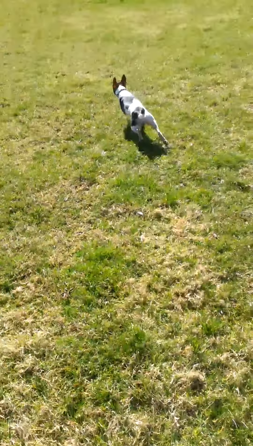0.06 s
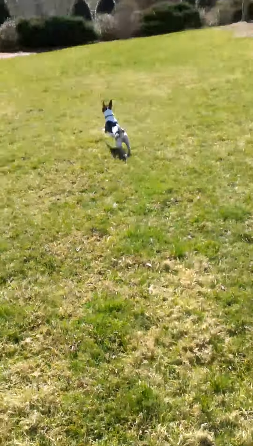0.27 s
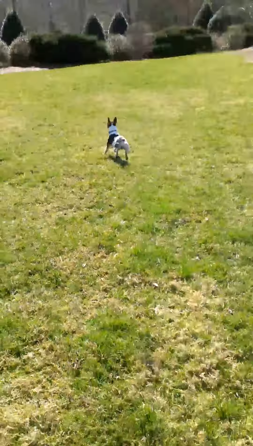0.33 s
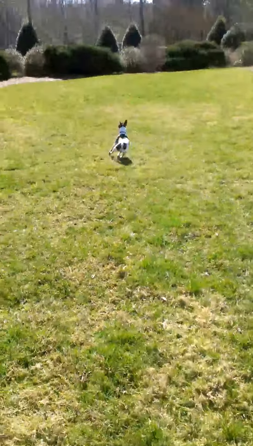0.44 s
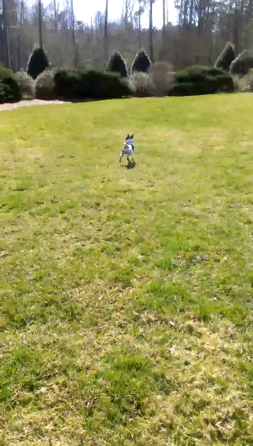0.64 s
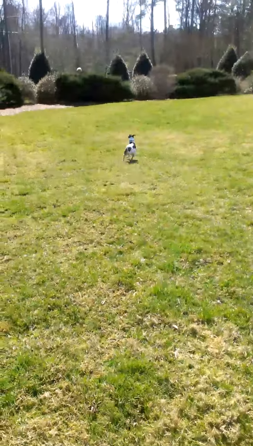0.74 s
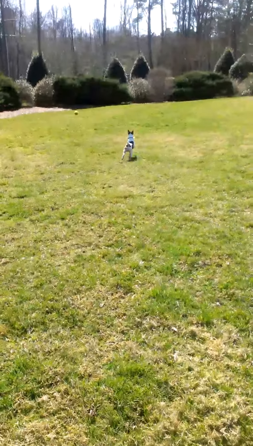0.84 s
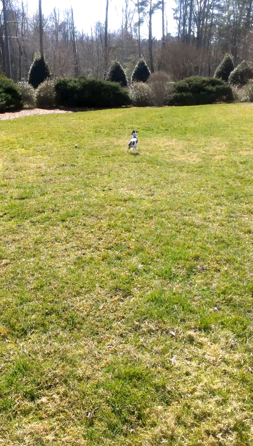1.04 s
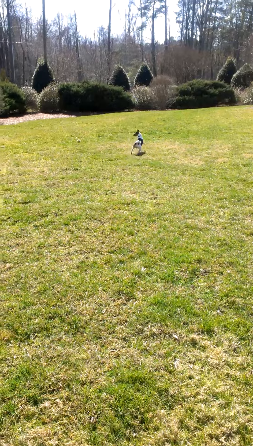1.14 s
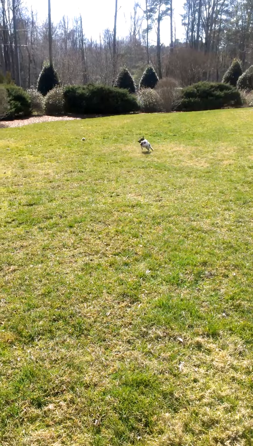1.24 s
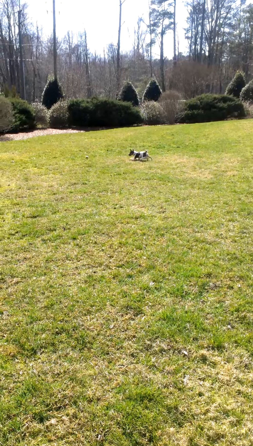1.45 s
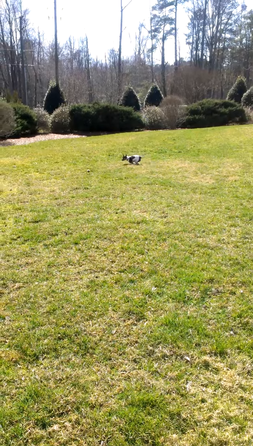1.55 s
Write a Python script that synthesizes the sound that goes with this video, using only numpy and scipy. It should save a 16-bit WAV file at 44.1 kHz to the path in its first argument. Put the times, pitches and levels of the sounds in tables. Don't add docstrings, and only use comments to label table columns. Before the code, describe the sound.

Small metal dog tags jingle in high, dry, quickly damped clinks, loudest in the first part, with paw swishes, crackling grass and soft thumps; open lawn, faint hiss and traffic rumble, handheld stereo microphone.

```python
import sys
import numpy as np
from scipy import signal
from scipy.fft import rfft, irfft
from scipy.io import wavfile
from scipy.ndimage import uniform_filter1d

SR = 44100
rng = np.random.default_rng(int(sys.argv[2]) if len(sys.argv) > 2 else 0)


def undo_db(level):
    steps = np.asarray(level, float) / 20
    return 10 ** steps


def log_audio(samples):
    frames = np.atleast_2d(samples).T
    limited = np.clip(frames, -1, 1)
    pcm = np.round(limited * 32767).astype(np.int16)
    wavfile.write(sys.argv[1], SR, pcm)


N = 70560

# (frequency [Hz], density [dB per Hz])
AIR_SPECTRUM = [(800, 1.5), (1500, -2), (3000, -5), (5000, -5.5), (10500, -1.5), (15800, -5.5)]
AIR_DB = -62.5
AIR_DUCK_DB = -19.5

# (frequency [Hz], density [dB per Hz])
RUMBLE_SPECTRUM = [(18, 14), (30, 6), (59, -16), (129, -15), (167, 3.5), (307, -2.5), (792, -10.5),
                   (1500, -32), (1950, -28), (3300, -120)]
RUMBLE_DB, RUMBLE_FALL_DB_PER_S = -61.5, 1.1
# (middle [s], level lift [dB], half width [s])
PAW_SCUFFS = [
    (0.067, -7, 0.018),
    (0.261, 7, 0.02),
    (0.508, -3.5, 0.041),
]

HUM_HZ, HUM_WIDTH_HZ, HUM_DB = 149, 29, -65.5

# (start [s], length [s], level [dB], first pitch [Hz], last pitch [Hz])
BIRD_CHIRPS = [
    (1.018, 0.017, -69, 3100, 3050),
    (1.03, 0.05, -64.5, 4230, 4010),
    (1.064, 0.021, -64.5, 3210, 3220),
    (1.081, 0.024, -59.5, 3105, 3044),
    (0.704, 0.039, -70.5, 1920, 1790),
    (.82, 0.014, -69.5, 3360, 3220),
    (1.155, 0.0093, -67, 3930, 3660),
    (1.367, 0.059, -75, 2310, 2010),
]

# (start [s], ring [s], level [dB], pitch [Hz], fade [dB])
GROUND_THUMPS = [
    (.122, 0.045, -55, 155.5, 9),
    (.24, 0.011, -42, 195, 13.5),
    (.254, 0.031, -45.5, 150, 0),
    (1.355, 0.037, -53.5, 140, -13),
    (1.358, 0.021, -57.5, 454, -20),
    (1.403, 0.01, -43.5, 223, -41),
    (1.089, 0.0066, -53, 786, -10),
    (1.09, 0.012, -58, 203, -11),
]
THUMP_RISE_S = 0.0021

# (middle [s], level [dB], half width [s])
GRASS_SWISHES = [(0, -51.5, 0.013), (0.064, -44, 0.017), (0.122, -53, 0.0094), (.19, -60, 0.009),
                 (0.215, -53.5, 0.017), (0.257, -54, 0.014), (.278, -45.5, 0.015), (.45, -62.5, 0.019),
                 (0.546, -56, 0.014), (0.598, -60, 0.0052), (.8, -68.5, 0.046), (0.879, -58.5, 0.0076),
                 (1.093, -50.5, 0.0098), (1.154, -64, 0.025), (1.385, -67.5, 0.055)]
# (frequency [Hz], density [dB per Hz])
GRASS_SPECTRUM = [(300, -10.5), (900, -24.5), (2000, -33.5), (3800, -16.5), (5300, -8), (8000, -3),
                  (16000, -19.5)]
RUSTLE_DB, RUSTLE_DB_PER_S = -56.5, -12.5
BLADES_PER_S, BLADE_SPREAD_DB = 5000, -1

# (time [s], peak [dB], pitch [Hz])
STALK_SNAPS = [(0.054, -44, 7900), (0.052, -37.5, 6600), (0.0548, -39, 7800), (0.0578, -31, 8600),
               (0.0596, -49, 7600), (0.0597, -34, 5350), (0.0619, -29, 7600), (0.0652, -40, 8300),
               (0.067, -33, 6600), (0.071, -46, 9700), (0.072, -51, 6750), (0.0727, -44, 7360),
               (0.077, -39, 7800), (0.112, -36.5, 5960), (0.1275, -51, 10000), (0.129, -39.5, 7800),
               (0.1912, -40, 10000), (0.1927, -36, 9900), (0.2167, -49, 7100), (0.2185, -38, 7650),
               (0.2194, -41, 6300), (0.2481, -37, 9700), (0.2512, -43, 10200), (0.2574, -37, 6300),
               (0.261, -35, 5460), (0.263, -43, 7340), (0.264, -35.5, 5800), (0.3388, -43, 6900),
               (0.446, -45, 8000), (0.4541, -53, 8350), (0.455, -41.5, 7400), (0.4717, -50, 9900),
               (0.4907, -41, 9450), (0.497, -45, 8200), (0.5043, -48, 10600), (0.597, -52, 6800),
               (0.5987, -55, 7500), (0.768, -45, 9200), (0.7695, -49, 7740), (0.8219, -39.5, 7030),
               (0.8587, -43, 9300), (0.9242, -45.5, 7800), (1.0897, -38, 7800), (1.0944, -40, 10000),
               (1.0953, -37.5, 6820), (1.096, -51, 7800), (1.1199, -45.5, 8600), (1.1529, -44.5, 8400),
               (1.1546, -42, 7000), (1.301, -53, 7700), (1.4466, -42, 6480), (1.468, -48, 8900),
               (1.5643, -38.5, 7880), (1.5661, -42.5, 6700)]
SNAP_S, SNAP_TAIL = 0.0004, 0.25

JANGLE_WIDTH_HZ, JANGLE_TOUCHES_PER_S, JANGLE_DB = 50, 130, -4.5

# (start [s], free ring [s], level [dB], pitch [Hz], fade over ring [dB])
DISC_STRIKES = [(0.116, 0.021, -56, 10170.0, 10), (0.2455, 0.01, -53, 9800, -8),
                (0.271, 0.0055, -50, 10300, 2), (0.2772, 0.0049, -29, 10180, -35),
                (0.284, 0.0063, -39.5, 10400, -5), (0.3985, 0.012, -30.5, 10040, 7),
                (0.408, 0.014, -38, 10140, -8), (0.5325, 0.0067, -45, 10050, 7),
                (0.5362, 0.006, -36.5, 10600, -5), (0.5405, 0.0071, -43.5, 9940, -2),
                (0.679, 0.027, -26, 10050, 3), (0.7055, 0.01, -25.5, 10090, -26),
                (0.792, 0.017, -55, 10050, -19), (1.024, 0.03, -57, 10060, -12),
                (0.8712, 0.0065, -48.5, 10070, 0), (0.881, 0.0057, -48.5, 10500, -3),
                (1.151, 0.018, -60.5, 10100, 1), (1.322, 0.023, -52.5, 10095.0, -7),
                (1.358, 0.098, -66, 10340, -8), (1.511, 0.022, -51.5, 10180, -4)]
# (start [s], free ring [s], level [dB], pitch [Hz], fade over ring [dB])
RING_STRIKES = [(0.1805, 0.01, -43, 9540, 2), (0.272, 0.012, -36, 9750.0, 12),
                (0.282, 0.013, -45, 9575.0, -13), (0.3985, 0.0072, -35, 9510, -7),
                (0.408, 0.014, -40.5, 9420, -18), (0.4795, 0.0077, -44, 9570, -2),
                (0.7055, 0.01, -37.5, 9530, -22), (0.718, 0.012, -53, 9470.0, -13),
                (0.8762, 0.0047, -47.5, 9970, 8), (1.025, 0.018, -50, 9580, -18),
                (1.322, 0.021, -56.5, 9660, 12), (1.511, 0.031, -55, 9645.0, 11)]
# (start [s], free ring [s], level [dB], pitch [Hz], fade over ring [dB])
PLATE_STRIKES = [
    (0.276, 0.011, -40.5, 6200, -1),
    (0.399, 0.0075, -47, 6170, 13),
    (0.4085, 0.0072, -48, 6000, 2),
    (0.679, 0.016, -52, 6070, -23),
    (0.706, 0.018, -41.5, 6070, -30),
    (0.8712, 0.0061, -50, 6000, -3),
    (1.024, 0.008, -57.5, 6100, -12),
    (1.322, 0.039, -59, 6190, 5),
    (1.511, 0.03, -58.5, 6230, 10),
]
# (start [s], free ring [s], level [dB], pitch [Hz], fade over ring [dB])
BUCKLE_STRIKES = [
    (0.113, 0.0089, -42.5, 6800.0, -7),
    (0.27, 0.0066, -38, 7085.0, 11),
    (0.412, 0.04, -57, 6885.0, -14),
    (0.679, 0.017, -65, 6870.0, -36),
    (0.71, 0.032, -52, 6825.0, -3),
    (0.743, 0.033, -54.5, 6840.0, 2),
]
# (start [s], free
# ring [s], level [dB], pitch [Hz], fade [dB])
LINK_STRIKES = [(.273, .013, -44, 14470, -4), (.3985, .008, -49, 13130, 0), (.399, .012, -48, 8720, -2),
                (.408, .024, -47, 13130, -12), (.534, .006, -49, 14450, -4), (.6785, .013, -62, 3640, -2),
                (.68, .016, -56, 13160, -6), (.7055, .024, -48, 13100, -16), (.7055, .008, -40, 10500, -10),
                (.7055, .006, -45, 7770, -15), (.873, .005, -59, 15500, 0), (1.025, .022, -63, 13200, -3)]
# (pitch ratio, level [dB], extra fade [dB])
DISC_OVERTONES = [(1.535, -35, -13)]
# (pitch ratio, level [dB], extra fade [dB])
RING_OVERTONES = [(1.485, -13, 0)]
# (pitch ratio, level [dB], extra fade [dB])
PLATE_OVERTONES = [(1.301, -15, -24)]
# (pitch ratio, level [dB], extra fade [dB])
BUCKLE_OVERTONES = [(2.258, -9, 0)]
# (time [s], left-right [dB])
DISC_FACING = [(.6, 4), (0.673, 4), (.703, 8), (.706, 0), (1.3, 2)]
# (time [s], peak [dB])
METAL_TICKS = [
    (0.3967, -53),
    (0.4064, -18),
    (0.5336, -22.5),
    (0.6794, -19),
    (0.705, -27.5),
    (1.0225, -34),
    (1.509, -32),
]
# (frequency [Hz], gain [dB])
TICK_SPECTRUM = [(4800, -32.5), (6200, -7.5), (9500, 1.5), (11800, -29), (14500, -3), (16000, -24)]
TICK_S, TICK_DB, TICK_LATE_S = 0.00023, -2.5, 0.001298

METAL_RISE_S, DAMP_POWER = 0.00058, 1.6
RATTLE, RATTLE_S = 0.75, 0.0012
PORT_TURN_RAD = 1.11


def evened(x):
    return x / np.sqrt(np.mean(x ** 2) + 1e-20)


def smoothed_twice(x, size):
    return uniform_filter1d(uniform_filter1d(x, size=size), size=size)


def read(points, hz):
    f, value = np.transpose(points)
    return np.interp(np.log(hz + 1), np.log(f + 1), value)


def add(mix, start_s, sound):
    part = mix[..., round(start_s * SR):][..., :sound.shape[-1]]
    part += sound[..., :part.shape[-1]]


def colour(x, points):
    gain = undo_db(read(points, np.fft.rfftfreq(N, 1 / SR)))
    return irfft(rfft(x) * gain, N)


def noise(points, patchy_db, same):
    hz = np.fft.rfftfreq(1024, 1 / SR)
    a, b, c, d, patches = rng.standard_normal((N // 256 + 5, 513, 5)).T
    patches = uniform_filter1d(patches, size=8, axis=0)
    patches = evened(uniform_filter1d(patches, size=8, axis=1))
    left, other = a + 1j * b, c + 1j * d
    right = same * left + np.sqrt(1 - same ** 2) * other
    z = np.array([left, right]) * undo_db(read(points, hz)[:, None] + patchy_db * patches)
    return evened(signal.istft(z, nperseg=1024, noverlap=768)[1][:, :N])


def rings(strikes, overtones, rise_s):
    out = np.zeros((2, N))
    for start, length, db, hz, fade_db in strikes:
        t = np.arange(0, length, 1 / SR)
        rise = np.minimum(t / rise_s, 1)
        damping = np.cos(np.pi / 2 * (t / length) ** DAMP_POWER)
        for ratio, top_db, more_db in [(1, 0, 0)] + overtones:
            partial_hz, partial_db = hz * ratio, db + top_db
            phase, turn = 2 * np.pi * rng.random(size=2)
            port_phase = PORT_TURN_RAD * np.sin(turn) * (partial_hz / 10500) ** 2
            phase = phase + np.array([[0], [port_phase]])
            loose = RATTLE * np.clip((-34 - partial_db) / 20, 0, 1) * min(hz / 3000, 1)
            knocks = rng.standard_normal((2, 100))
            a, b = (np.interp(t / RATTLE_S, np.arange(len(k)), k) for k in knocks)
            rattle = 1 + loose * (a + 1j * b) / np.sqrt(2)
            level = undo_db(partial_db + (fade_db + more_db) * (t / length - 0.288))
            level = level / np.sqrt(1 + loose ** 2)
            tone = rattle * np.exp(1j * (2 * np.pi * partial_hz * t + phase))
            add(out, start, np.sqrt(2) * rise * damping * level * tone.imag)
    return out


def air(metal):
    duck = 1 + uniform_filter1d(abs(metal).mean(axis=0), size=700) / undo_db(AIR_DUCK_DB)
    return undo_db(AIR_DB) * noise(AIR_SPECTRUM, patchy_db=3.5, same=0.18) / duck


def rumble():
    t = np.arange(N) / SR
    scuff = 1 + sum(undo_db(db) * np.exp(-((t - s) / w) ** 4) for s, db, w in PAW_SCUFFS)
    level = undo_db(RUMBLE_DB - RUMBLE_FALL_DB_PER_S * t) * scuff
    return level * noise(RUMBLE_SPECTRUM, patchy_db=2.0, same=0.92)


def hum():
    b, a = signal.iirpeak(HUM_HZ, HUM_HZ / HUM_WIDTH_HZ, SR)
    return undo_db(HUM_DB) * evened(signal.lfilter(b, a, rng.standard_normal(N)))


def birds():
    out = np.zeros(N)
    for start, length, db, first_hz, last_hz in BIRD_CHIRPS:
        u = np.arange(0, length, 1 / SR) / length
        shape = np.sin(np.pi * u) ** 0.55
        flutter = 1 + 0.33 * np.sin(2 * np.pi * (110 * u * length + rng.random()))
        cycles = np.cumsum(first_hz + (last_hz - first_hz) * u) / SR
        add(out, start, np.sqrt(2) * undo_db(db) * shape * flutter * np.sin(2 * np.pi * cycles))
    return out


def thumps():
    return rings(GROUND_THUMPS, [(2.1, -16.0, 13.6), (3.4, -21.0, 3.7)], THUMP_RISE_S)


def jangle():
    out = np.zeros((2, N))
    for hz in [6000, 6870, 9400, 10000, 10340]:
        size, pick, side = rng.random((N, 3)).T
        touches = np.log(size + 0.012) * (pick < JANGLE_TOUCHES_PER_S / SR)
        b, a = signal.iirpeak(hz, hz / JANGLE_WIDTH_HZ, SR)
        out += signal.lfilter(b, a, touches * np.array([side, 1 - side]))
    return undo_db(JANGLE_DB) * evened(out)


def grass():
    t = np.arange(N) / SR
    strides = sum(undo_db(db) * np.exp(-((t - s) / w) ** 2) for s, db, w in GRASS_SWISHES)
    level = undo_db(RUSTLE_DB + RUSTLE_DB_PER_S * t) + strides
    size, pick, sign, drift, side = rng.random((N, 5)).T
    blade_size = undo_db(-BLADE_SPREAD_DB * np.log(np.maximum(size, 0.01)))
    blades = blade_size * (pick < BLADES_PER_S / SR) * np.sign(sign - 0.5)
    flicker = evened(undo_db(2.1 * evened(smoothed_twice(drift, 150) - 0.5)))
    mid = evened(colour(blades, GRASS_SPECTRUM)) * flicker
    width = 0.23 * np.array([[1], [-1]]) * evened(colour(side - 0.5, GRASS_SPECTRUM))
    return (mid + jangle() + width) * level


def snaps():
    lead = 30
    t, out = np.arange(-lead, 200) / SR / SNAP_S, np.zeros(N)
    shape = np.exp(-t ** 2) + SNAP_TAIL * np.maximum(t, 0) * np.exp(-t / 2)
    for s, db, hz in STALK_SNAPS:
        waver = 0.72 * uniform_filter1d(rng.standard_normal(len(t)), size=5)
        tone = np.cos(2 * np.pi * hz * SNAP_S * t + waver)
        add(out, s - lead / SR, undo_db(db) * tone * shape)
    return out


def ticks():
    t, out = np.arange(300) / SR / TICK_S, np.zeros(N)
    shape = t * np.exp(1 - t) + 0.35 * np.exp(-t / 6)
    for s, db in METAL_TICKS:
        grit = rng.standard_normal(len(t)) * shape
        grit = grit / np.linalg.norm(grit) * np.sqrt(TICK_S * SR) * 2
        add(out, s + TICK_LATE_S, undo_db(db + TICK_DB) * grit)
    return colour(out, TICK_SPECTRUM)


def collar():
    pan_db = np.interp(np.arange(N) / SR, *np.transpose(DISC_FACING)) / 2
    disc = rings(DISC_STRIKES, DISC_OVERTONES, METAL_RISE_S) * undo_db(np.array([pan_db, -pan_db]))
    ring = rings(RING_STRIKES, RING_OVERTONES, METAL_RISE_S)
    plate = rings(PLATE_STRIKES, PLATE_OVERTONES, METAL_RISE_S)
    buckle = rings(BUCKLE_STRIKES, BUCKLE_OVERTONES, METAL_RISE_S)
    link = rings(LINK_STRIKES, [], METAL_RISE_S)
    return disc + ring + plate + buckle + link + ticks()


def scene():
    metal = collar()
    ground = (thumps() + hum()) * undo_db(np.array([[-0.8], [0.8]]))
    return air(metal) + rumble() + birds() + ground + grass() + snaps() + metal


def top_cut(x):
    return signal.sosfilt(signal.butter(12, 16630, fs=SR, output="sos"), x)


def record(dry):
    cut = []
    for x, hz in zip(dry, (110, 90)):
        low_cut = signal.butter(3, hz, "high", fs=SR, output="sos")
        cut.append(signal.sosfilt(low_cut, x))
    band_limit = signal.firwin(511, 15900, window=("kaiser", 8), fs=SR)
    mix = signal.oaconvolve(np.array(cut), band_limit[None], "same") - 0.0006
    return top_cut(mix)


dry = scene()
out = record(dry)
log_audio(out)
```